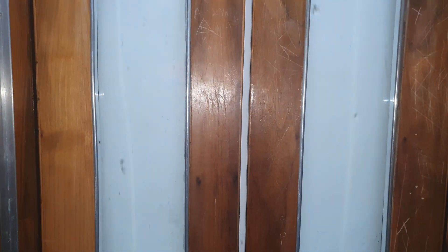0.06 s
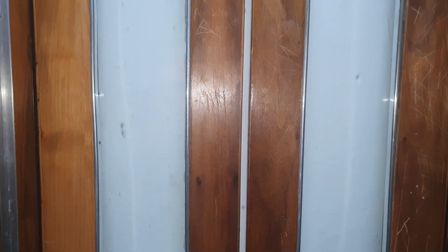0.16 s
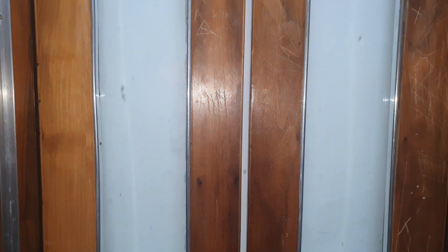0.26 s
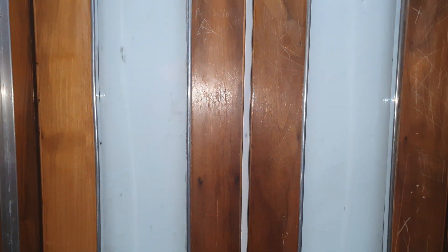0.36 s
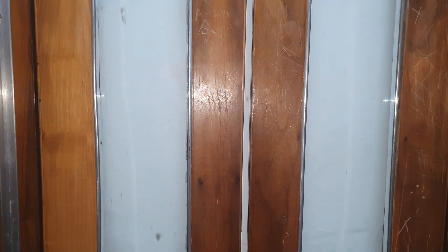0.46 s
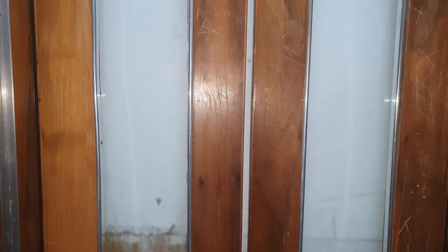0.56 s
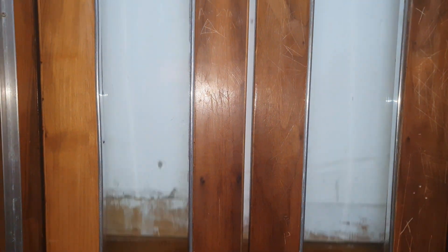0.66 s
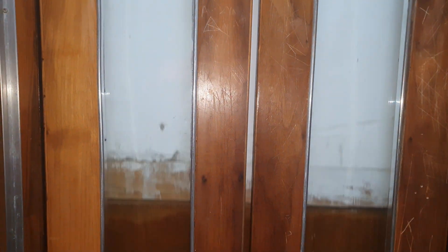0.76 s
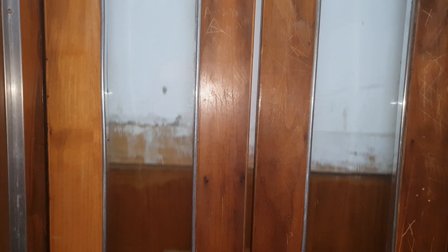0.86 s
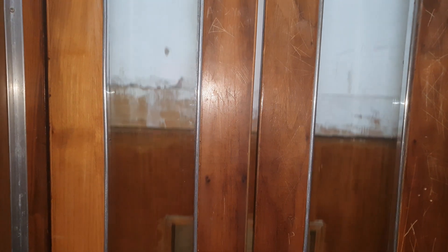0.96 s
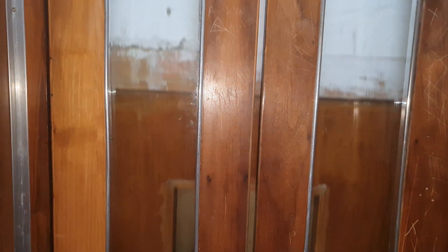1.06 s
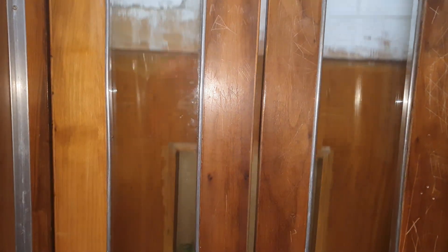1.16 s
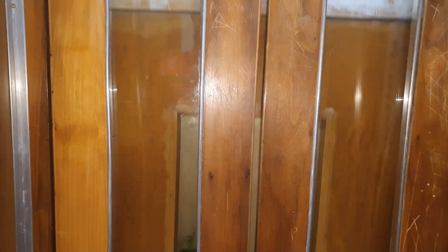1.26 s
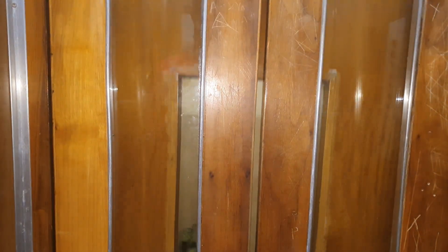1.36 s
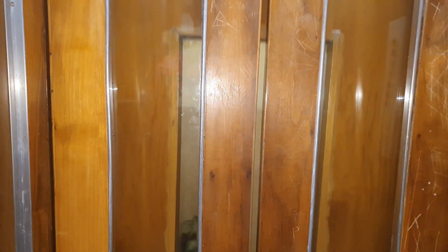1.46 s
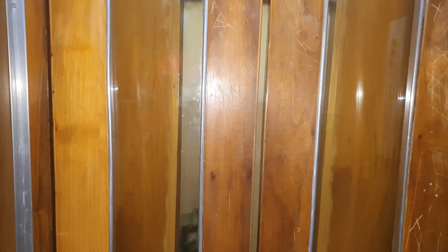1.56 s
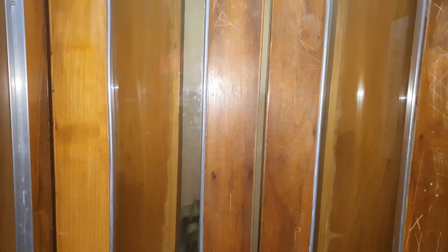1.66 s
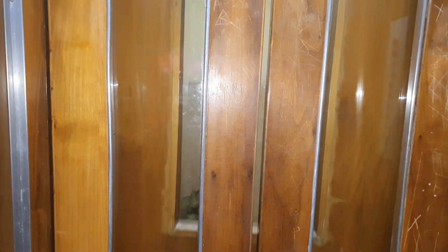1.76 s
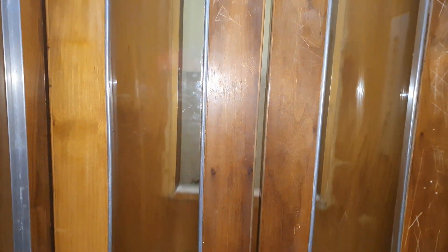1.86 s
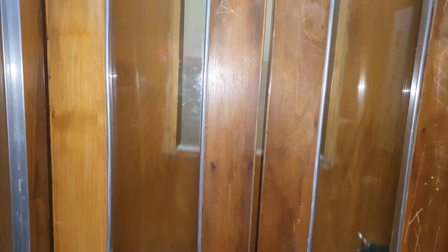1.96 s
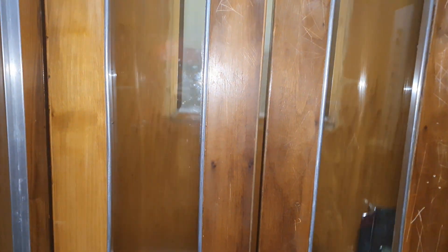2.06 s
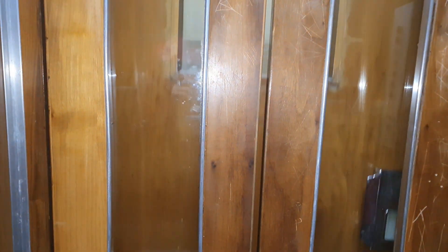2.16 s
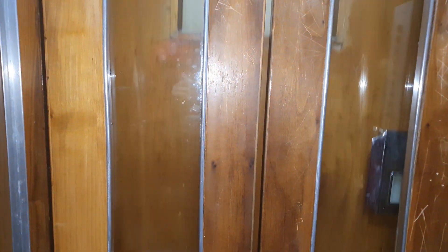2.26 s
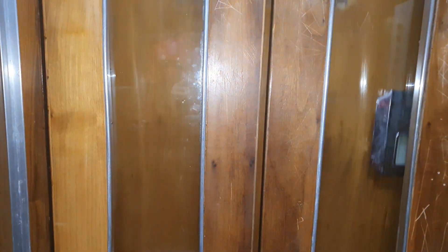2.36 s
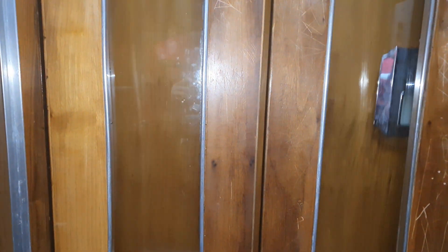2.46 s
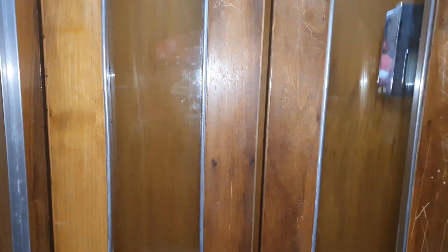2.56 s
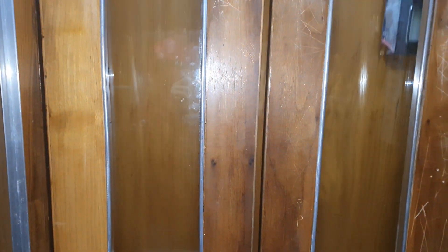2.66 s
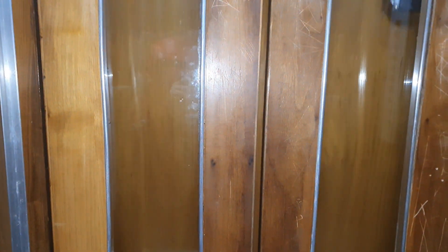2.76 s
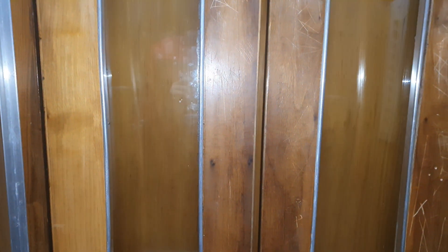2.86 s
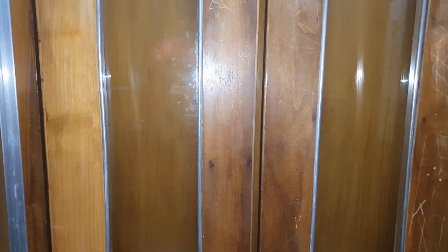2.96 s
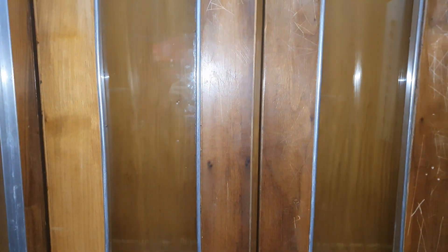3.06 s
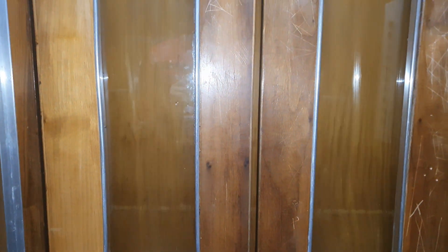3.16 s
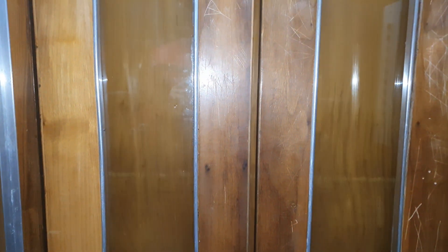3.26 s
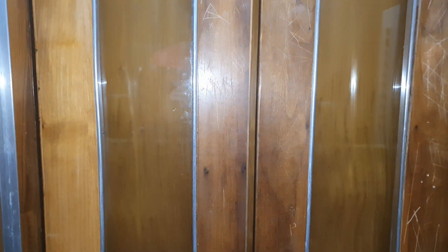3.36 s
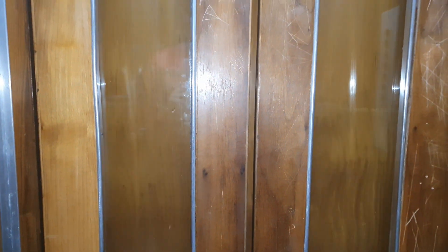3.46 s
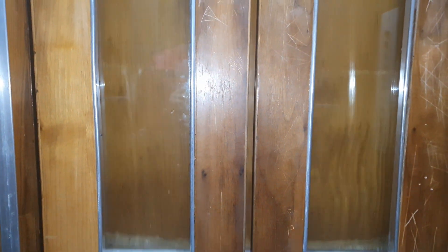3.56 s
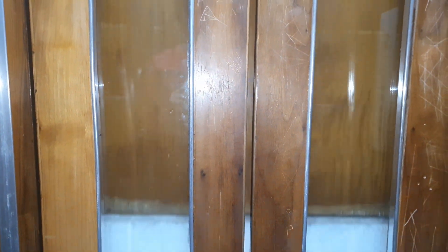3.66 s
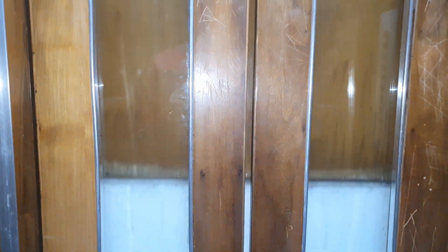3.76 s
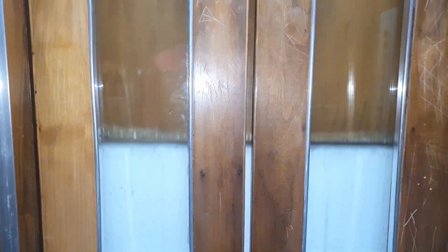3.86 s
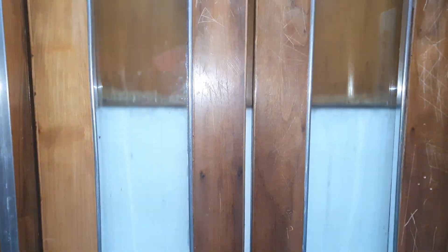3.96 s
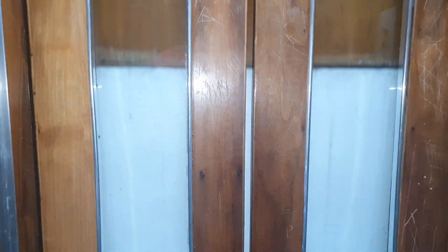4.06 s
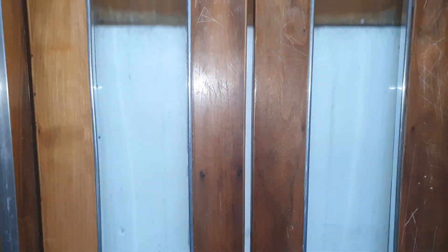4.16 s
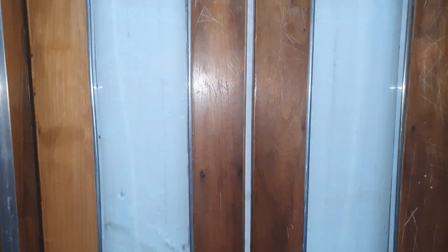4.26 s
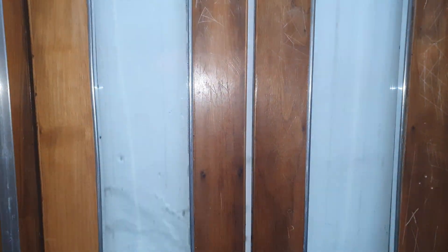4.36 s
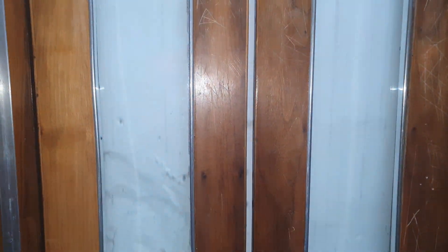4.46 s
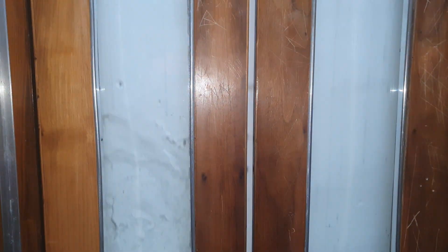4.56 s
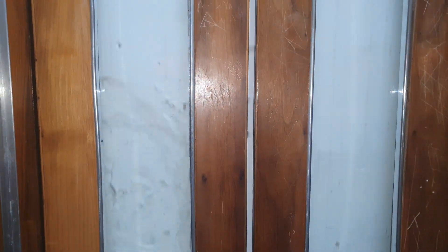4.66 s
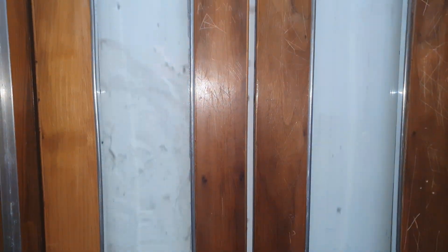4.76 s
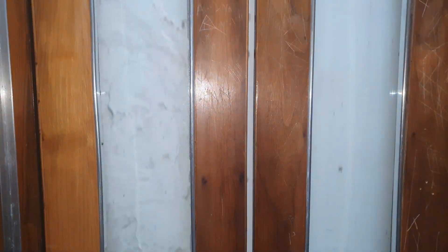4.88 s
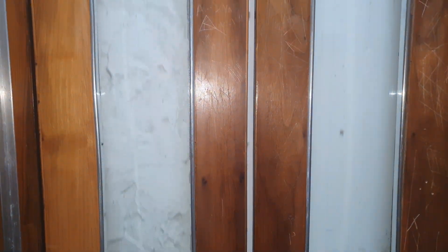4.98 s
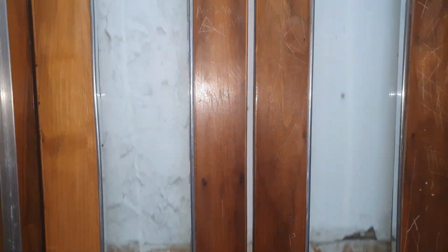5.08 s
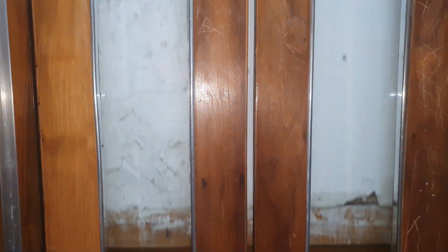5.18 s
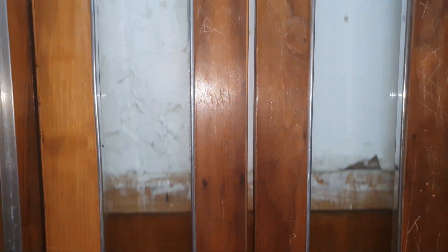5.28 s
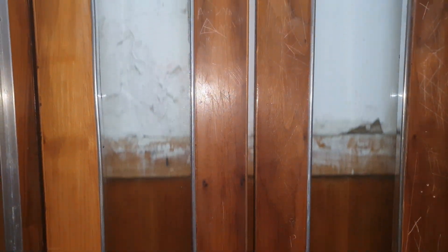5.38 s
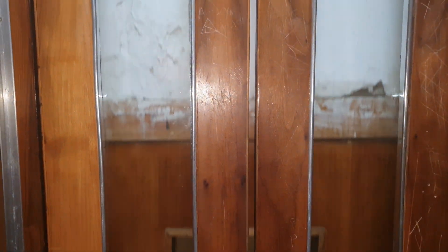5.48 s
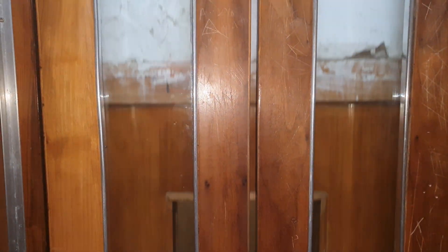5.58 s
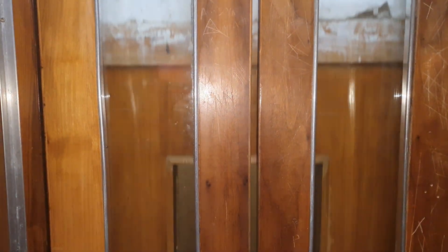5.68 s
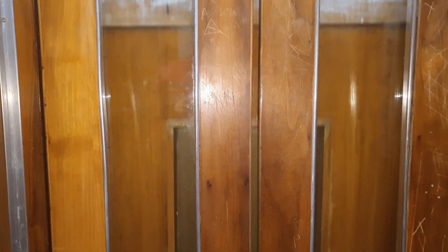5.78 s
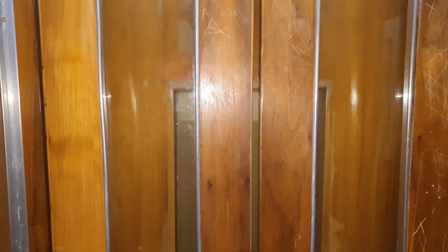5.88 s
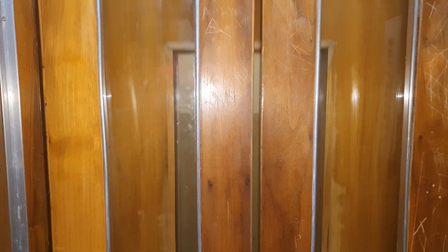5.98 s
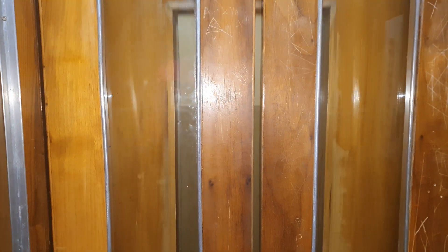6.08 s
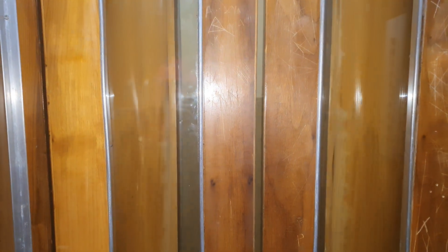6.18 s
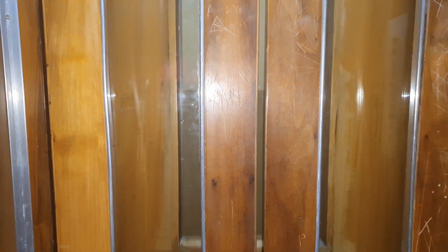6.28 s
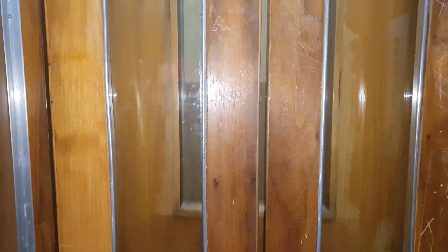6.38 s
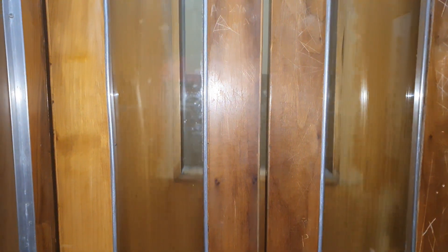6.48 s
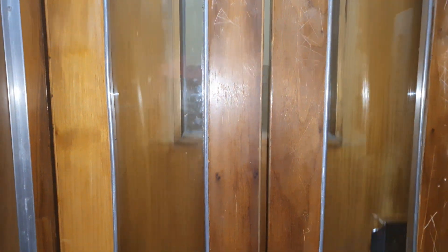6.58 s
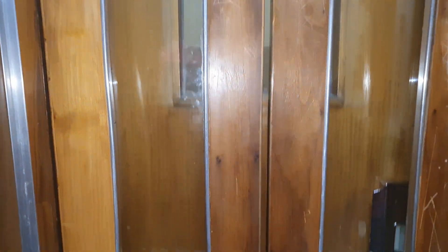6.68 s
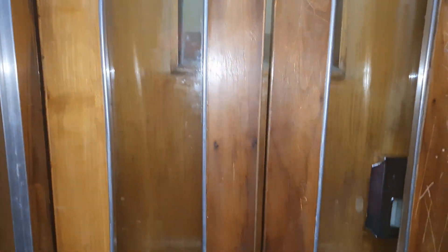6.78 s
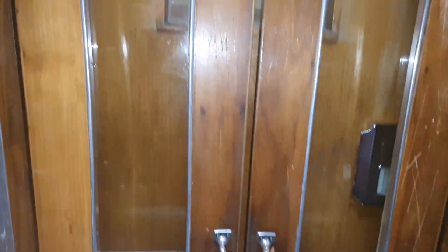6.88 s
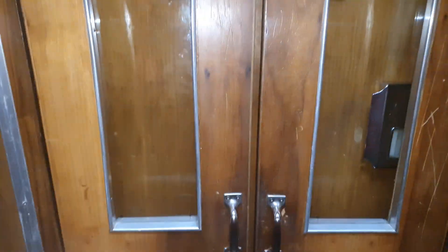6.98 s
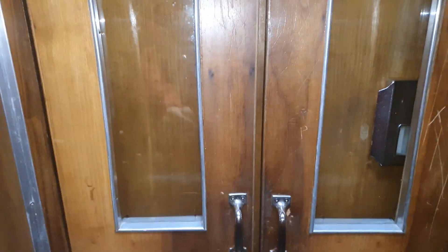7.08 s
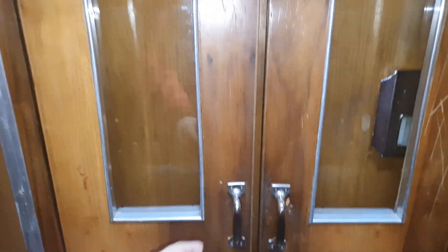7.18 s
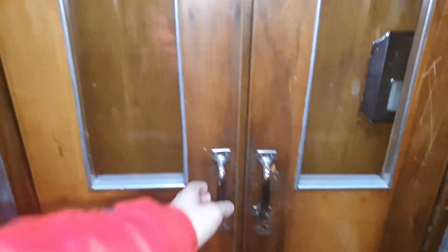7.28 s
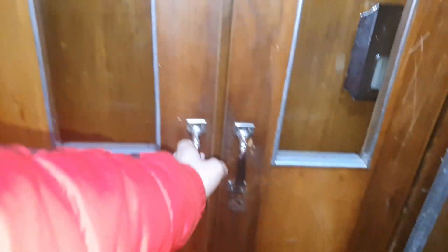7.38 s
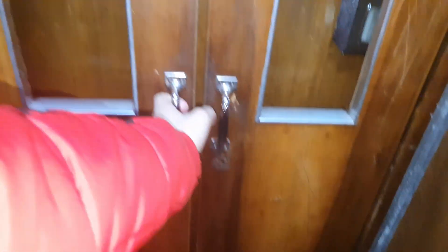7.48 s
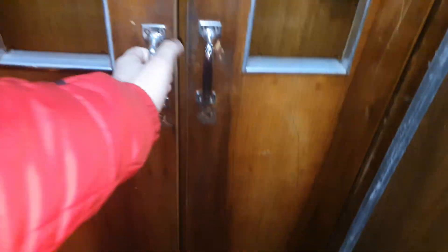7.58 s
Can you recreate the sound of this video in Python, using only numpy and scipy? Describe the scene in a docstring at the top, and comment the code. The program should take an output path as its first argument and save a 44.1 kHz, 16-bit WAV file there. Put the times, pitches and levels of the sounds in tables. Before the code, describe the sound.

Inside a small old wooden lift moving down, a deep bassy rumble and wavering motor hum run throughout, with soft rail sliding and very faint hiss. From 0 to 0.5 s loose doors give small dull knocks, ending in a firmer one. A nylon jacket brushes lightly, clearest near 1.7 and 4 s. Around 2 to 2.7 s come faint taps and ticks; a cluster of clacks at 3.0 to 3.2 s, then softer knocks to 4.7 s. A dull thud falls at 6.1 s. At 6.47 s a heavy, hard double clunk rings the panels and shakes the car, trailed by a short dry squeak to 6.7 s. A very sharp snap hits close on the left at 6.85 s, followed by sleeve rustle until 7.3 s and low floor booms. Small snaps at 7.4 to 7.5 s lead to a loud, raspy rub and deep boom at 7.58 s.

```python
"""Inside an old wooden lift car going down: shaped noise for rumble, sliding and hiss, wavering tones for the motor.
From the start a nylon jacket brushes softly (noise swells) and loose doors knock and tick (ringing noise bursts).
Near a landing the car strikes the door-lock lever: a heavy clunk of ringing modes, then short squeaky tones.
Next a sharp snap, the sleeve rustling as an arm reaches out (a noise stroke), and low booms of the floor.
At the end the hand pulls at the door with more snaps, a loud rub of low and raspy noise, and one more boom."""
import sys
import numpy as np
from scipy import signal
from scipy.fft import rfft, irfft, next_fast_len
from scipy.io import wavfile
from scipy.ndimage import uniform_filter1d

SR = 44100
rng = np.random.default_rng(int(sys.argv[2]) if len(sys.argv) > 2 else 0)


def to_wav(sig):
    """Store sig (one row per channel, or 1-D mono) as 16-bit WAV at the path in sys.argv[1].

    Samples outside -1..1 are clipped; the rate is SR.
    """
    pcm = np.clip(np.atleast_2d(sig), -1, 1) * 32767
    pcm = np.round(pcm).astype(np.int16)
    wavfile.write(sys.argv[1], SR, pcm.T)  # frames by channels


N = 336483
TIME = np.arange(N) / SR


def amp(db):
    """Turns decibels into a gain."""
    return 10 ** (np.asarray(db) / 20)


def evened(x):
    """Scales a sound to an average (rms) strength of 1."""
    return x / np.sqrt(np.mean(x ** 2) + 1e-20)


def read(points, hz):
    """Reads a curve between its points, on a log-frequency axis."""
    f, value = np.transpose(points)
    return np.interp(np.log(hz + 1), np.log(f + 1), value)


def level(rows):
    """Gain over time from a dB curve."""
    return amp(np.interp(TIME, *np.transpose(rows)))


def swells(rows):
    """Gain over time of a few bell-shaped swells."""
    return sum(amp(db) * np.exp(-((TIME - s) / half) ** 2) for s, half, db in rows)


def stroke(db, full_s, until_s, rise, fall):
    """Gain over time of one stroke: it swells, holds and fades, at rise and fall dB per s."""
    before = np.maximum(full_s - TIME, 0)
    after = np.maximum(TIME - until_s, 0)
    return amp(db - abs(rise) * before - abs(fall) * after)


def add(mix, s, sound):
    """Mixes a sound in at time s."""
    part = mix[:, max(round(s * SR), 0):][:, :sound.shape[-1]]
    part += sound[..., :part.shape[1]]


def pan(db):
    """Gains that make the left louder than the right by db."""
    return amp([[db / 2], [-db / 2]])


def drift(rate_hz):
    """Slow random wandering with an rms of 1."""
    hz = np.fft.rfftfreq(next_fast_len(N), 1 / SR)
    real, imaginary = rng.standard_normal((2, len(hz)))
    return evened(irfft((real + 1j * imaginary) * np.exp(-(hz / rate_hz) ** 2))[:N])


# how alike the sound is at the two microphones: (f/Hz, likeness from -1 to 1)
MICROPHONE_LIKENESS = [(60, 1), (130, 0.99), (290, 0.46), (640, .6), (1410, -0.22), (3000, 0.054),
                       (15000, -0.18)]


def noise(colour, size=N):
    """Noise at the two microphones, alike in the bass; colour gives dB for each Hz."""
    hz = np.fft.rfftfreq(next_fast_len(size + 2), 1 / SR)
    a, b, c, d = rng.standard_normal((4, len(hz)))
    same = np.clip(read(MICROPHONE_LIKENESS, hz), -1, 1)
    mid = np.sqrt(1 + same) * (a + 1j * b)
    side = np.sqrt(1 - same) * (c + 1j * d)
    return evened(irfft(np.array([mid + side, mid - side]) * amp(colour(hz)))[:, :size])


def wash(spectrum):
    """Steady noise with a given spectrum."""
    return noise(lambda hz: read(spectrum, hz))


def steadied(x, span):
    """Evens out swells slower than span seconds."""
    power = uniform_filter1d((x ** 2).mean(0), max(int(span * SR), 2))
    return x / np.sqrt(power + 1e-9)


def shudder():
    """Gain of the shaking that every heavy blow or boom leaves in the car."""
    def shake(s, db):
        t = np.maximum(TIME - s, 0)
        # harder blows shake the car more, by 0.44 dB for each dB; the shaking falls 60 dB in 0.85 s
        return amp(-29.5 + 0.44 * db - 60 * t / 0.85) * (1 - np.exp(-t / 0.012))
    blows = sum(shake(s, db) ** 2 for s, db, _ in HEAVY_BLOWS)
    booms = sum(shake(s, db - 6) ** 2 for s, _, _, db in FLOOR_BOOMS)
    return np.sqrt(blows + booms)


# how hard the car rumbles, before a 1.8 dB cut and a flutter: (t/s, level/dB)
RUMBLE_LEVEL = [(0, -30.5), (.6, -31), (1.25, -35.5), (2.4, -32), (4.1, -32.5), (4.6, -30), (5, -35),
                (5.5, -33), (5.8, -37), (6.1, -29.5), (6.4, -32)]
# spectrum of the rumble: (f/Hz, level/dB per Hz)
RUMBLE_SPECTRUM = [(15, -48.5), (25, -26.5), (35, 8), (48, 10), (62, 7), (73, 11.5), (84, 15), (100, 6.5),
                   (114, -7), (150, -15), (220, -64.5), (600, -130)]
# spectrum of the guide shoes sliding on their rails: (f/Hz, level/dB per Hz)
SLIDE_SPECTRUM = [(90, -16), (135, 5), (200, 3.5), (270, 5), (300, 2.5), (345, -5), (395, -1.5), (430, -7),
                  (500, -5), (580, -10.5), (640, -11.5), (720, -15.5), (1000, -25), (1800, -31.5),
                  (8000, -89.5)]
# spectrum of the soft, steady hiss: (f/Hz, level/dB per Hz)
HISS_SPECTRUM = [(700, -6), (1400, -2.5), (2300, -0.5), (3400, 1), (6700, -2), (7600, -15), (12000, -8.5),
                 (15800, -12)]
SLIDE_DB, HISS_DB = -53.5, -76.5


def ride():
    """The car rumbles on its ropes and its shoes slide on the rails, louder while a blow shakes the car."""
    flutter = amp(-1.8 + 1.4 * drift(8))
    rumble = steadied(wash(RUMBLE_SPECTRUM), 0.097) * level(RUMBLE_LEVEL) * flutter
    slide = wash(SLIDE_SPECTRUM) * (amp(SLIDE_DB + 1.16 * drift(14)) + shudder())
    hiss = wash(HISS_SPECTRUM) * amp(HISS_DB + 1.1 * drift(5))
    return rumble + slide + hiss


# motor and gear tones: (f/Hz, level/dB, wavering as a share of the tone)
MOTOR_TONES = [(39, -46.5, 0.7), (99.4, -41.5, 0.3), (123.5, -50, .3), (170.8, -62, 0.97)]
# level of one more gear tone: (t/s, level/dB)
GEAR_LEVEL = [(0, -57), (1.6, -59), (3.4, -48), (4, -54), (4.9, -49.5), (7.63, -58)]
# low drones that swell and fade along the way: (f/Hz, level/dB, full from t/s, full until t/s)
LOW_DRONES = [(82.5, -39.5, 2.2, 3.3), (74.3, -41, 4.0, 6.4)]
# tones of the panels buzzing along with the mains hum: (multiple of the hum, level/dB)
BUZZ_TONES = [(2, -1), (3, 0), (4, -3), (5, -3.5)]
# swells on top of the steady buzz: (middle t/s, half length t/s, level/dB)
BUZZ_SURGES = [(2.4, .35, -60.5), (4.4, .15, -63)]
GEAR_HZ, MAINS_HUM_HZ = 247.0, 99.44
BUZZ_DB, DRONE_FADE_DB_PER_S = -65.5, 6


def machine():
    """Motor and gear tones come down the ropes, wavering in level and phase, and the panels buzz."""
    def tone(hz, waver):
        swing = 1 + waver * (drift(3.23) + 1j * drift(3.5))
        return evened((swing * np.exp(2j * np.pi * hz * TIME)).real)

    out = level(GEAR_LEVEL) * tone(GEAR_HZ, waver=0.3)
    for hz, db, waver in MOTOR_TONES:
        out += amp(db) * tone(hz, waver)
    for hz, db, full, until in LOW_DRONES:
        swell = stroke(db, full, until, rise=DRONE_FADE_DB_PER_S, fall=DRONE_FADE_DB_PER_S)
        out += swell * tone(hz, waver=0.4)
    buzz = sum(amp(db) * tone(k * MAINS_HUM_HZ, waver=0.9) for k, db in BUZZ_TONES)
    return out + (amp(BUZZ_DB) + swells(BUZZ_SURGES)) * buzz


# nylon brushing as the rider shifts: (middle t/s, half length t/s, level/dB)
JACKET_BRUSHES = [(.09, .07, -70.5), (.75, .25, -70), (1.538, 0.047, -70), (1.711, 0.053, -63.5),
                  (2.88, 0.15, -73), (3.958, 0.061, -64), (6.056, .04, -70.5)]
# spectrum of brushing nylon: (f/Hz, level/dB per Hz)
BRUSH_SPECTRUM = [(1000, -14), (2500, -16), (4000, -7), (5500, -3), (6800, -1), (7600, -18), (10000, -10),
                  (12500, -25), (14000, -10), (16000, -20)]
# spectrum of the sleeve as the arm sweeps forward: (f/Hz, level/dB per Hz)
SLEEVE_SPECTRUM = [(290, -27), (500, -7.5), (569, -13.5), (1030, -14), (1710, -16.5), (1940, -12.5),
                   (2560, -13.5), (4630, -14.5), (7040, -17.5), (8130, -25.5), (11300, -23.5),
                   (15800, -25.5)]
# the sweep of the arm: (level/dB, full from t/s, full until t/s, rise/dB per s, fall/dB per s)
SLEEVE_STROKE = (-47, 6.87, 7.31, 160, 50)
# faint, uneven stirring that dies away as the rider settles
STIR_START_DB, SETTLE_DB_PER_S, STIR_SWING_DB = -76, 1.6, 3


def jacket():
    """Nylon brushes on nylon in countless tiny slips, heard as flickering noise."""
    stirring = amp(STIR_START_DB - SETTLE_DB_PER_S * TIME + STIR_SWING_DB * drift(5))
    strength = np.hypot(swells(JACKET_BRUSHES), stirring)
    brushing = wash(BRUSH_SPECTRUM) * strength * amp(0.76 * drift(40))
    reach = wash(SLEEVE_SPECTRUM) * stroke(*SLEEVE_STROKE) * amp(1.1 * drift(50))
    return brushing + reach * pan(1.3)


# resonances of the door panels: (f/Hz, width f/Hz, lift level/dB)
PANEL_RESONANCES = [(302, 16, 6.5), (395, 8.3, 8.5), (508.5, 45, 9.5), (642, 35, 4), (855, 50, 4),
                    (980, 16, 3.5), (1187, 100, 6), (1440, 63, 6.5), (2100, 110, 1), (2490, 69, 5.5),
                    (2950, 200, 3), (3310, 56, 5.5), (3900, 130, 5)]


def panel_db(hz):
    """Lift that the door panels give to each frequency."""
    return sum(db / (1 + (2 * (hz - f) / width) ** 2) for f, width, db in PANEL_RESONANCES)


def ring(colour, t60, rise, size=20000):
    """Strong first reflections, a quick decay in the small car, then a faint longer echo from the shaft."""
    t = np.arange(size) / SR
    car = (1 + 0.19 * np.exp(-t / 0.0026)) * amp(-60 * t / t60)
    shaft = amp(-19 - 60 * t / 0.71)
    onset = 1 - np.exp(-t / rise)
    return steadied(noise(colour, size=size), 0.01) * onset * np.hypot(car, shaft)


RATTLES_PER_S, RATTLE_DB, RATTLE_SPREAD_DB = 1.2, -51, 2.5
RATTLE_LEAST_DULLNESS = 11  # dB per octave


def rattles():
    """Faint, dull knocks at random moments, as rows like those of the door knocks."""
    rows = []
    for when, size, soft in rng.random((int(RATTLES_PER_S * N / SR), 3)):
        db = RATTLE_DB + RATTLE_SPREAD_DB * (2 * size - 1)
        rows.append((when * N / SR, db, RATTLE_LEAST_DULLNESS + 2 * soft, 0))
    return rows


# blows on the doors and their gear; soft contacts are duller, hollow wood clacks more:
# (t/s, level/dB, dullness/dB per octave, clack level/dB)
DOOR_KNOCKS = [(.046, -37, 8.2, 1), (.204, -40, 9, 0), (.242, -41.5, 6.2, -1), (.270, -38, 8.5, -2),
               (.318, -34.5, 5.7, 2), (.36, -40, 8.5, 0), (.517, -31.5, 4.3, -1), (1.999, -39.5, 5.7, -3),
               (2.120, -37, 6.8, -4), (2.430, -42, 10.5, -2), (3.004, -41, 6.2, 3), (3.023, -30, 4, -1),
               (3.093, -39, 3.7, 5), (3.141, -33.5, 6.7, 8), (3.170, -33, 9, -4), (3.312, -39, 13, -4),
               (3.388, -40, 11, -1), (3.650, -36, 8, 2), (3.824, -39.5, 10.3, 4), (4.350, -42, 12, -6),
               (4.438, -39.5, 10.5, 2), (4.561, -37, 14, -2), (4.597, -37, 14, -1), (4.742, -54, 2.1, 0),
               (6.137, -34.5, 11.2, 5), (6.175, -42, 11, 6), (6.458, -35, 12, 0), (6.472, -18, 4, -9),
               (6.492, -26, 1.6, -1), (6.502, -22, 1.9, -4), (6.516, -23, 5.5, -7), (6.570, -29.5, 4.4, -1),
               (6.700, -38, 8, -4), (6.742, -39, 6.5, -4), (7.039, -38.5, 2.3, 2), (7.480, -43, 3.2, 6),
               (7.532, -27, 3.2, 0), (7.566, -26, -1.3, -3)]
# thud, clack, snap and top of a blow: (low f/Hz, high f/Hz, time to fall 60 dB t/s, shortest rise t/s)
BLOW_PARTS = [(241, 926, 0.22, 0.001), (875, 2290, 0.16, 0.0015), (2480, 5360, .18, 0.0017),
              (5000, 29000, 0.14, 0.00098)]
# spectrum of struck wood: (f/Hz, level/dB per Hz)
WOOD_SPECTRUM = [(200, 13.5), (500, 0), (800, -9), (1500, -11.5), (3000, -16), (5000, -18), (7000, -20),
                 (12000, -27), (16000, -32)]
# light ticks of the metal fittings: (t/s, level/dB)
METAL_TICKS = [(2.172, -58.5), (2.737, -62), (4.327, -67.5), (4.7, -62), (4.73, -59), (5.264, -63.5),
               (5.997, -61)]
# spectrum of a tick: (f/Hz, level/dB per Hz)
TICK_SPECTRUM = [(1200, -28), (2300, -8), (3000, 3), (5000, 1), (6800, -12), (8000, -24), (16000, -31)]
THUD_DB, SNAP_DB, TOP_DB = 1.5, 2.7, -2  # lift of those parts in every blow
SLOWER_RISE_S = 0.0008  # extra rise time for each dB per octave of dullness above 5.5


def doors():
    """Each blow rings the panels; a soft contact has less treble and builds up more slowly."""
    out = np.zeros((2, N))
    for s, db, dullness, clack_db in DOOR_KNOCKS + rattles():
        softness_s = SLOWER_RISE_S * max(dullness - 5.5, 0)
        lifts = [THUD_DB, clack_db, SNAP_DB, TOP_DB]
        for lift_db, (lo, hi, t60, rise) in zip(lifts, BLOW_PARTS):
            def colour(hz):
                outside = (lo / (hz + 1)) ** 8 + (hz / hi) ** 20  # grows beyond the edges of the part
                return read(WOOD_SPECTRUM, hz) + panel_db(hz) - 10 * np.log10(1 + outside)
            octaves = np.log2(lo / BLOW_PARTS[0][0])  # above the thud
            gain = amp(db + lift_db - dullness * octaves)
            add(out, s, gain * ring(colour, t60, rise + softness_s))
    for s, db in METAL_TICKS:
        tick = ring(lambda hz: read(TICK_SPECTRUM, hz) + panel_db(hz), t60=0.27, rise=0.00079)
        add(out, s, amp(db) * tick)
    return out


# heavy blows that shake the car: (t/s, level/dB, contact time t/s)
HEAVY_BLOWS = [(.32, -33, 0.008), (.518, -27, 0.007), (4.595, -32.5, 0.0098), (6.14, -27, 0.0055),
               (6.472, -9.5, 0.0036), (6.5015, -7.5, 0.0075), (6.572, -22, 0.0059)]
# tones at which the car body rings: (f/Hz, level/dB, time to fall 60 dB t/s)
CAR_MODES = [(84, -6.5, 0.28), (97, -1.5, 0.25), (170, -3, 0.35), (204, -13, 0.23), (223, -8, 0.35),
             (242, -3, 0.33), (269, -2.5, 0.047), (312.5, -13, .3), (385, -14, 0.29), (499, -4.5, 0.33),
             (613, -13, 0.24)]
# the floor booms as weight shifts on it, and again as the door is pulled:
# (t/s, length t/s, f/Hz, level/dB)
FLOOR_BOOMS = [(6.925, .06, 70, -17.5), (6.982, 0.031, 76.5, -21), (7.085, 0.053, 69.6, -20.5),
               (7.578, .055, 52, -13)]


def thumps():
    """A push and its recoil set the modes of the car swinging; the floor booms in short, low bursts."""
    out, t = np.zeros((2, N)), np.arange(SR) / SR
    body = np.zeros((2, SR))
    for hz, db, t60 in CAR_MODES:
        # less alike at the two microphones means further out of step
        lead = np.arccos(np.clip(read(MICROPHONE_LIKENESS, hz), -1, 1)) / 2
        body += amp(db - 60 * t / t60) * np.sin(2 * np.pi * hz * t + np.array([[lead], [-lead]]))
    for s, db, contact in HEAVY_BLOWS:
        push = np.sin(2 * np.pi * np.minimum(t / contact, 1))  # a long contact favours the low modes
        push = push / abs(rfft(push)).max()
        add(out, s, amp(db) * signal.fftconvolve(body, push[None], axes=1))
    for s, length, hz, db in FLOOR_BOOMS:
        bump = np.sin(np.pi * np.minimum(t / length, 1))
        add(out, s, amp(db) * bump * np.sin(2 * np.pi * hz * t))
    return out


# dry squeaks of the lock lever: (t/s, length t/s, f/Hz, level/dB)
LEVER_SQUEAKS = [(6.554, 0.13, 2920, -48), (6.655, 0.035, 2420, -57), (6.65, 0.08, 6880, -62)]
# overtones of a squeak: (multiple of its pitch, level/dB)
SQUEAK_OVERTONES = [(1, -4), (2, -21), (3, -30), (4, -20)]


def squeaks():
    """Dry metal sticks and slips at a nearly steady pitch."""
    out, wobble = np.zeros((2, N)), 1 + 0.006 * drift(120)
    for s, length, hz, db in LEVER_SQUEAKS:
        size = int(length * SR)
        turns = np.cumsum(hz * wobble[:size]) / SR
        tone = np.zeros((2, size))
        for k, k_db in SQUEAK_OVERTONES:
            if k * hz < SR / 2:
                start = rng.random() + np.array([[0], [0.2]])  # the right runs a fifth of a turn ahead
                tone += amp(k_db) * np.sin(2 * np.pi * (k * turns + start))
        rough = evened(tone * amp(2.5 * drift(250))[:size])
        add(out, s, amp(db) * rough * signal.windows.tukey(size, 0.6))
    return out


# sharp snaps right at the left microphone: (t/s, level/dB)
SHARP_SNAPS = [(6.8535, -2.5), (7.4287, -28), (7.499, -33), (7.506, -26)]
# spectrum of a snap: (f/Hz, level/dB per Hz)
SNAP_SPECTRUM = [(20, -17), (100, 6.5), (600, 0.5), (1200, -5.5), (2000, -4), (2600, -8), (7000, -9.5),
                 (7800, -17), (10500, -23), (14000, -19), (16000, -32)]
# spectrum of the body of the rub as the door is pulled: (f/Hz, level/dB per Hz)
BODY_SPECTRUM = [(20, -4), (45, 4), (100, -2.5), (200, -7), (400, -11.5), (700, -17.5), (1000, -13.5),
                 (1400, -23), (2500, -62)]
# spectrum of the rasp of the rub: (f/Hz, level/dB per Hz)
RASP_SPECTRUM = [(700, -69), (1500, -3.5), (2200, -1.5), (3500, -1.5), (5500, -2), (7000, -10.5),
                 (8000, -14.5), (13000, -16), (16000, -22)]
# stroke of the body: (level/dB, full from t/s, full until t/s, rise/dB per s, fall/dB per s)
BODY_STROKE = (-14, 7.560, 7.615, 430, 250)
# stroke of the rasp: (level/dB, full from t/s, full until t/s, rise/dB per s, fall/dB per s)
RUB_RASP_STROKE = (-19.7, 7.572, 7.606, 450, 400)


def handling():
    """Dry snaps next to one microphone, and uneven rubbing as the hand pulls at the door."""
    grip = amp(1.66 * drift(160))
    body = steadied(wash(BODY_SPECTRUM), 0.03) * stroke(*BODY_STROKE)
    rasp = wash(RASP_SPECTRUM) * stroke(*RUB_RASP_STROKE) * pan(-0.5)
    out = grip * (body + rasp)
    log_gain = np.log(amp(read(SNAP_SPECTRUM, abs(np.fft.fftfreq(4096, 1 / SR)))))
    # this choice of phases starts the snap all at once and leaves a short tail
    snap = np.fft.ifft(np.exp(np.conj(signal.hilbert(log_gain)))).real
    snap = -snap / abs(snap).max()
    for s, db in SHARP_SNAPS:
        add(out, s, amp(db) * snap * amp([[0], [-22]]))  # much weaker on the right
    return out


def scene():
    """Everything heard inside the car."""
    return ride() + machine() + jacket() + doors() + thumps() + squeaks() + handling()


# colour of the left microphone against the right: (f/Hz, level/dB)
LEFT_COLOUR = [(60, -0.2), (200, 0), (600, 0.5), (1200, 0.5), (2500, -1), (5000, -3.5), (8000, 5),
               (12000, 3), (16000, 3)]
TREBLE_EDGE_HZ = 15850


def record(dry):
    """The microphones differ in colour and drop the deepest bass; then a full-scale limit and a treble cut."""
    balance_db = read(LEFT_COLOUR, np.fft.rfftfreq(N, 1 / SR))
    heard = irfft(rfft(dry) * amp([balance_db / 2, -balance_db / 2]), N)
    heard = signal.sosfilt(signal.butter(2, 30, "highpass", fs=SR, output="sos"), heard)
    treble_cut = signal.firwin(511, TREBLE_EDGE_HZ, window=("kaiser", 9), fs=SR)
    return signal.oaconvolve(np.clip(heard, -1, 1), treble_cut[None], "same")


dry = scene()
out = record(dry)
to_wav(out)
```